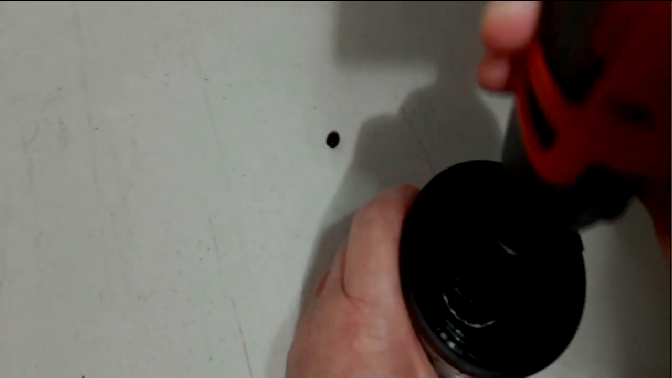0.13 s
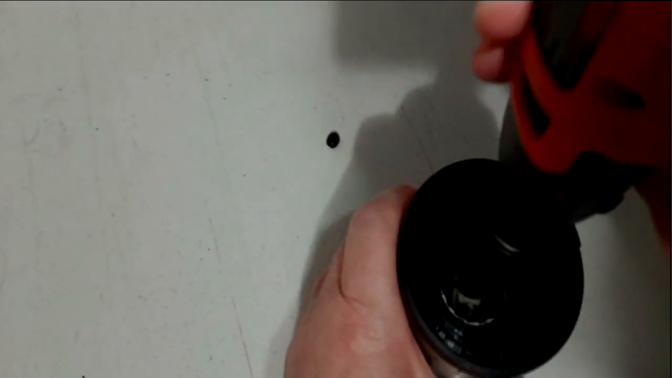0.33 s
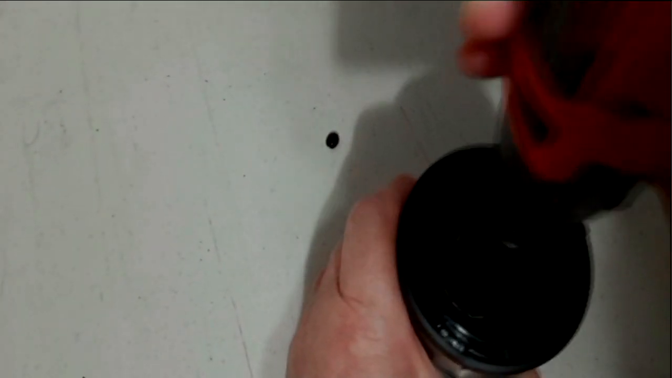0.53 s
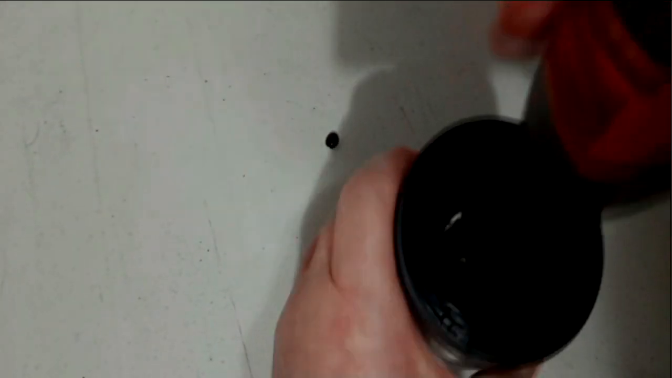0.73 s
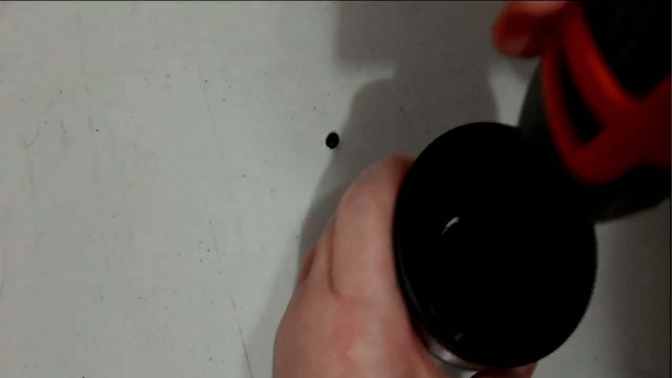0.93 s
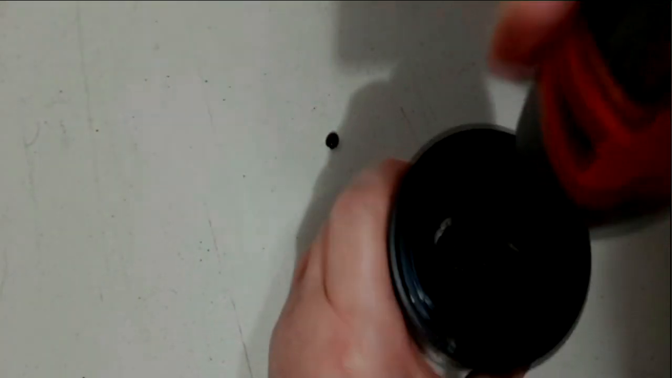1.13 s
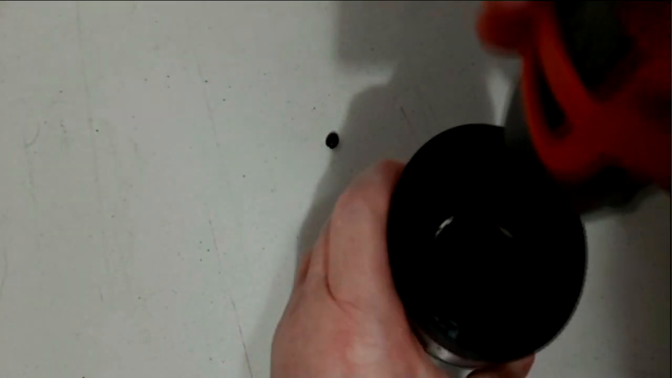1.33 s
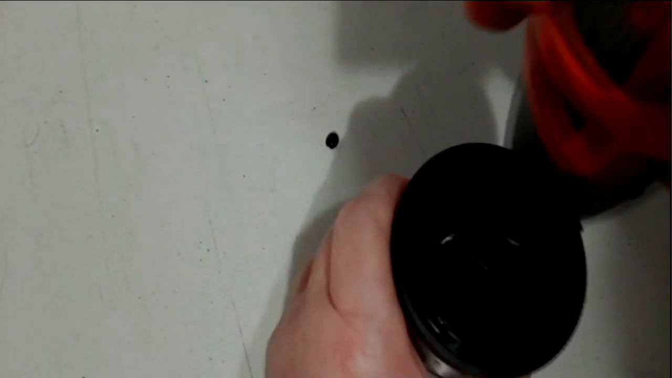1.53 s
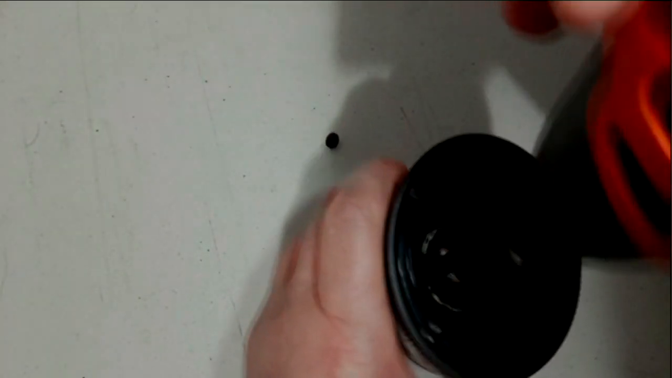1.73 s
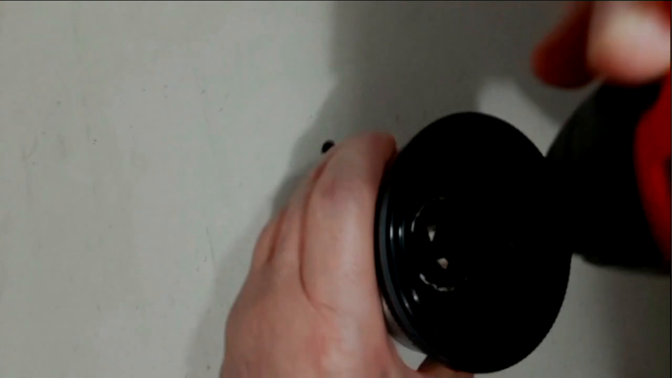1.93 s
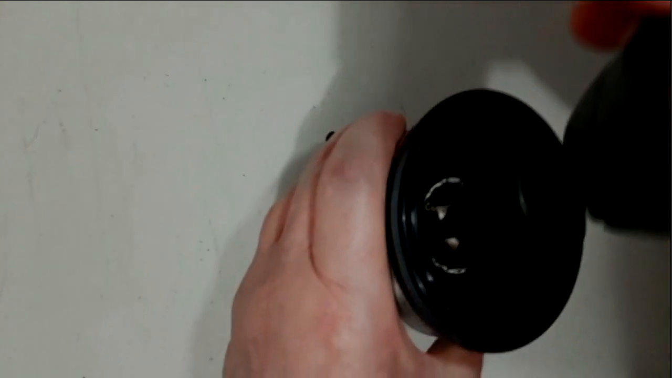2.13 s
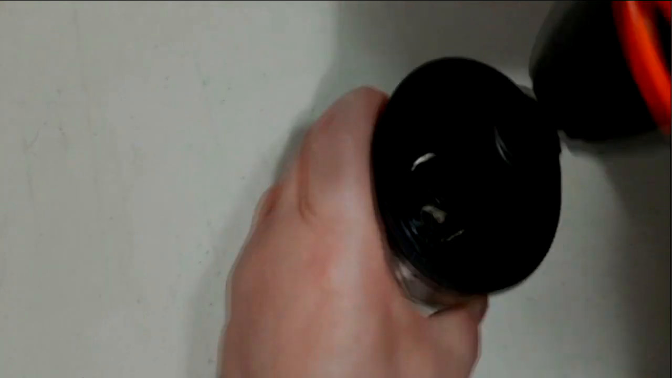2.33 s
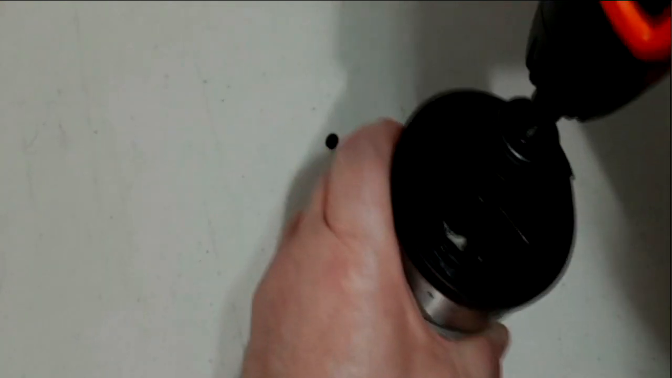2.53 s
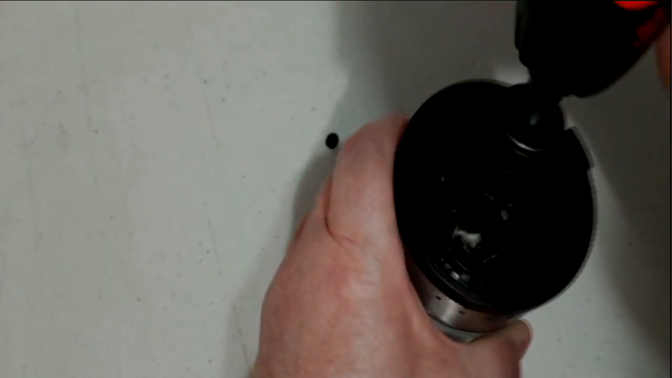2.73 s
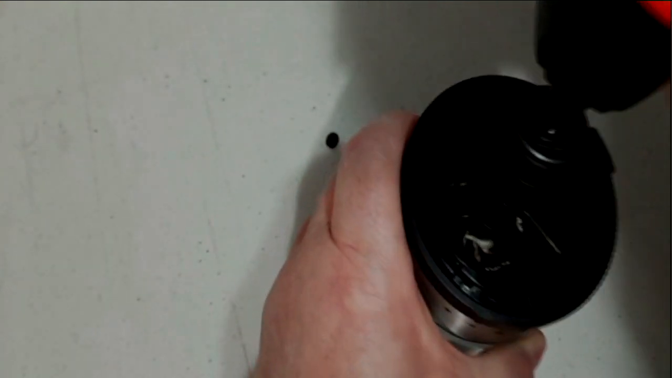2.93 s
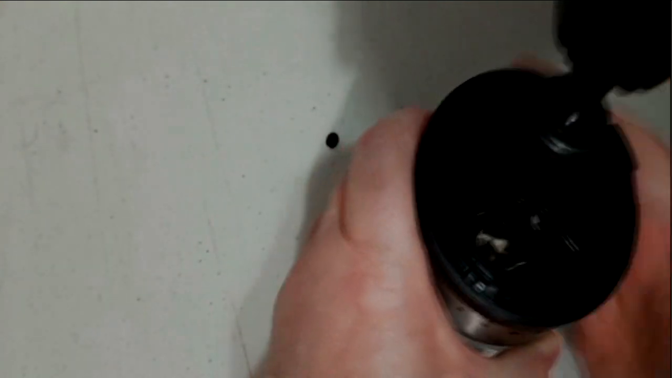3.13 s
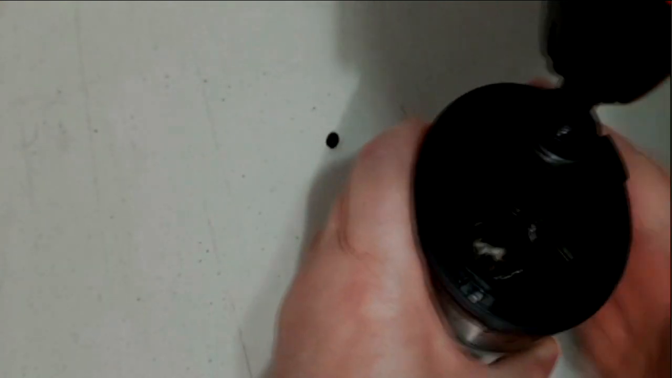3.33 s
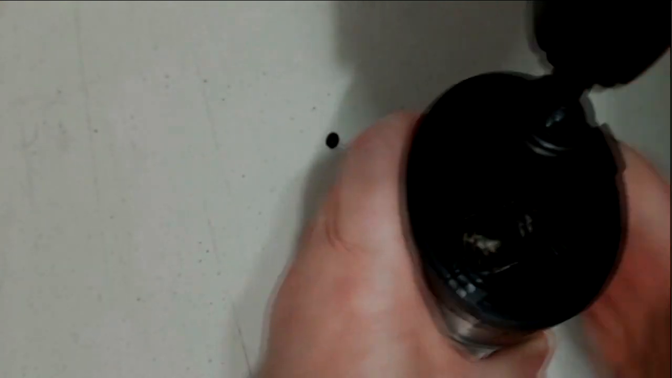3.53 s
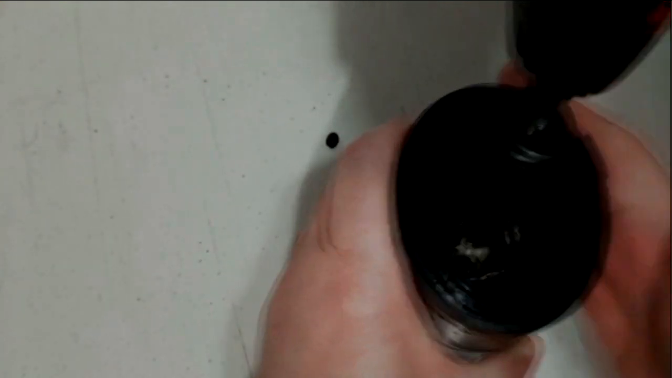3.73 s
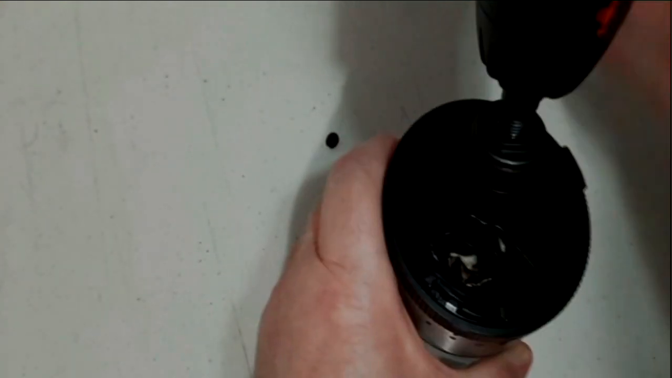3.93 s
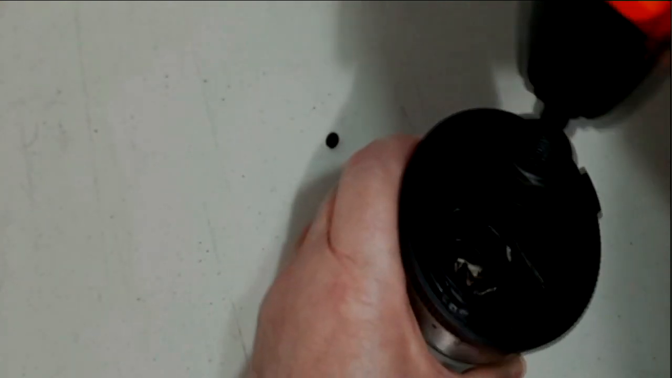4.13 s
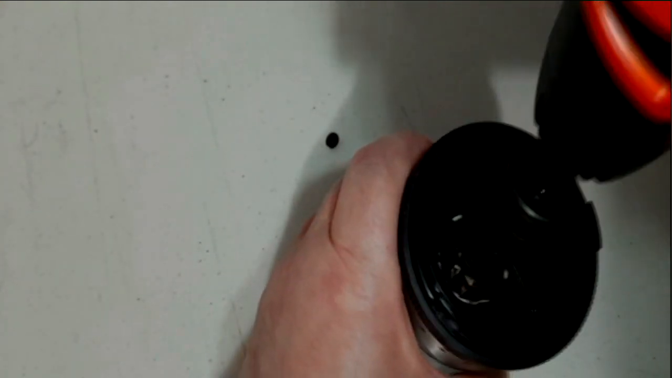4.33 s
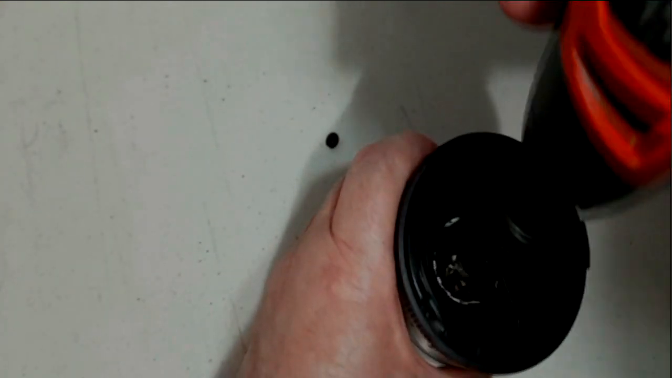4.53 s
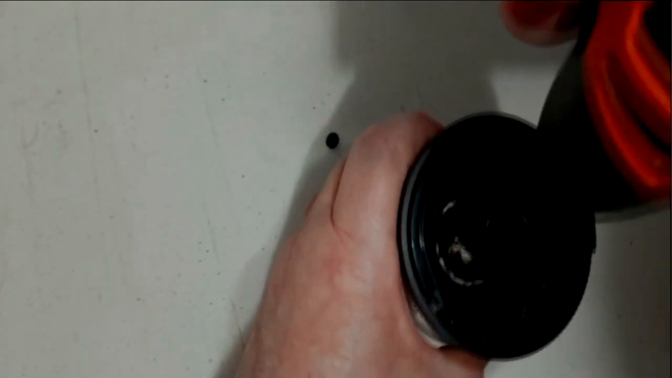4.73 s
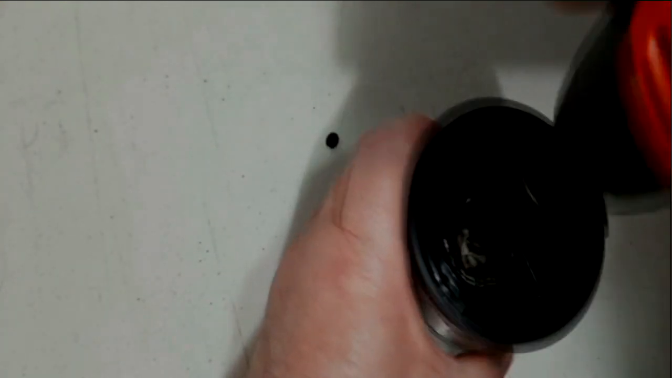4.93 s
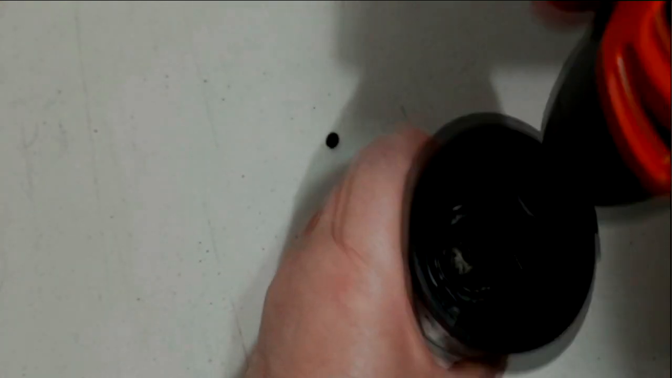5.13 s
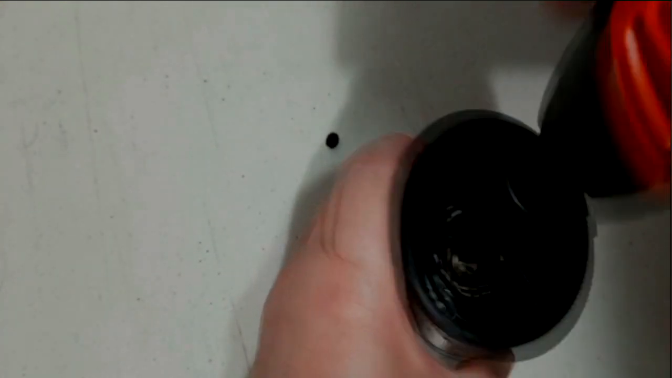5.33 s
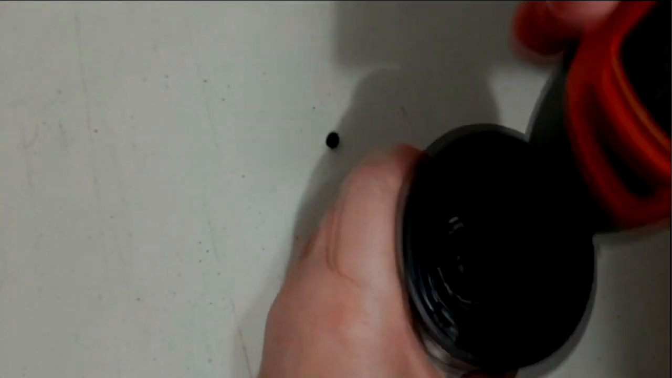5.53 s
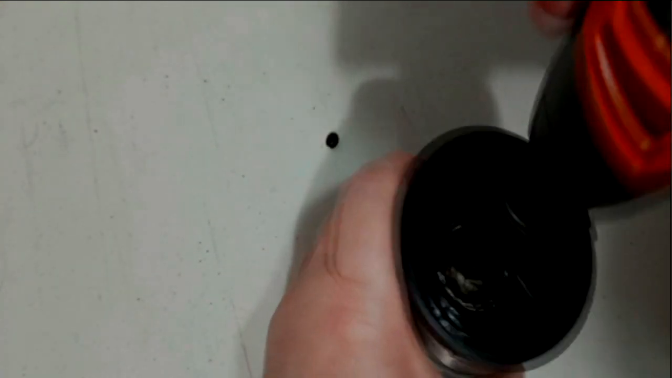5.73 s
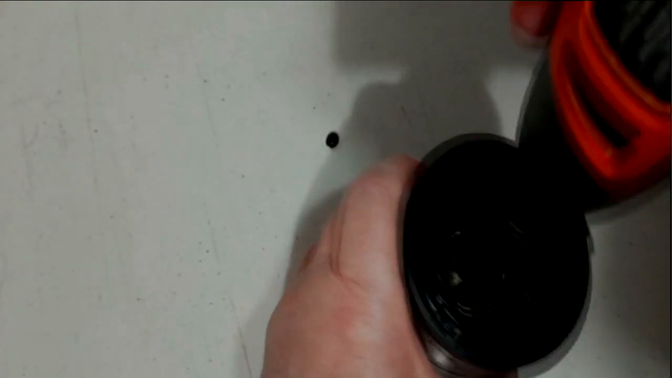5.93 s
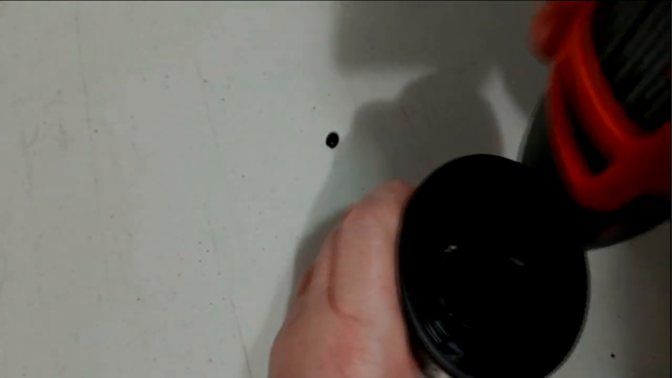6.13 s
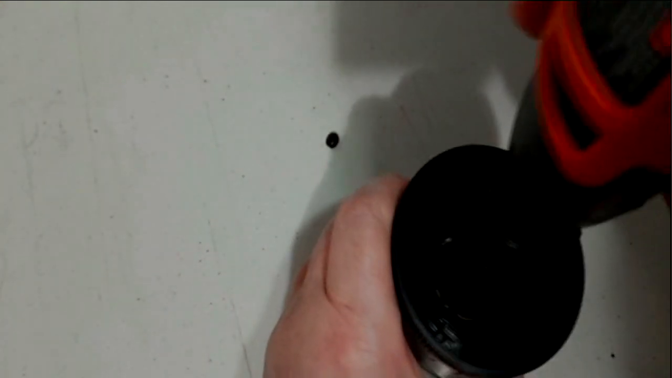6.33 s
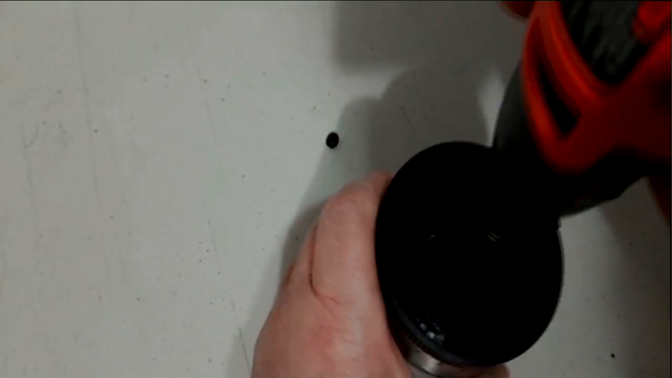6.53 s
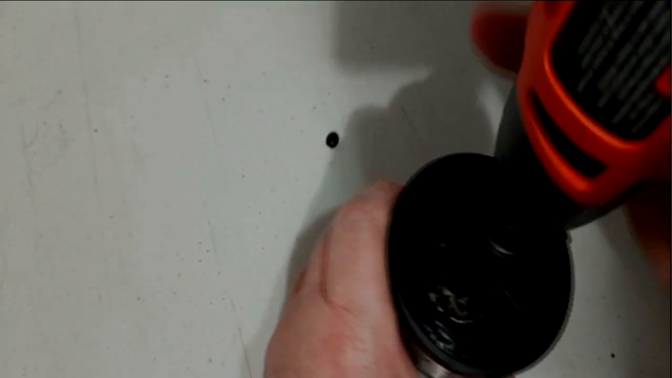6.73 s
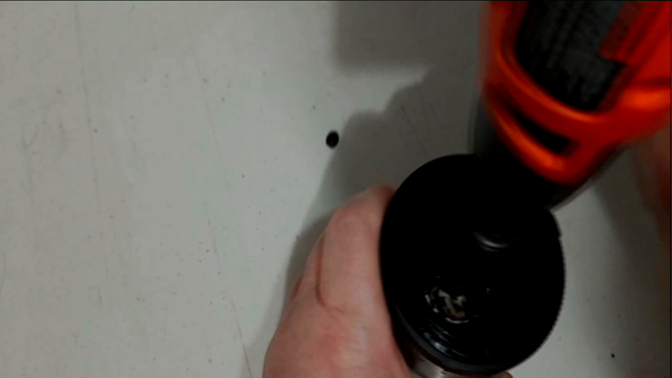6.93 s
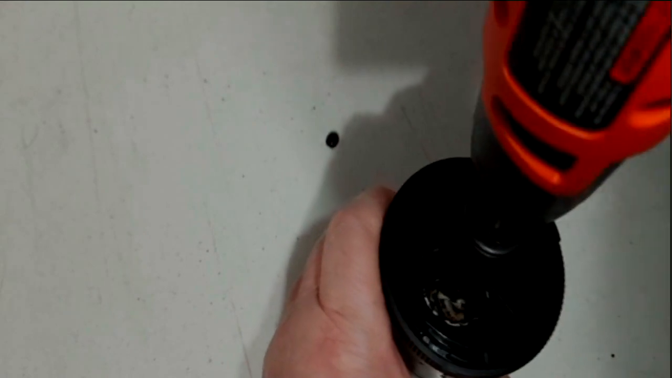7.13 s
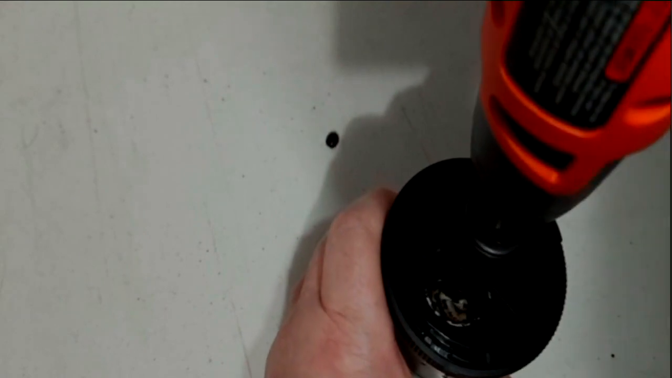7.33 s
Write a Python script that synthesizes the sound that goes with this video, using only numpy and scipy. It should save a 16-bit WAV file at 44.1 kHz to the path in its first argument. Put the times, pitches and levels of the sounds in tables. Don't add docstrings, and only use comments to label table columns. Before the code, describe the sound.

Close motor whine and crunchy bean grinding winds down, a clutch ring clicks four times, the motor grinds again, coasts down, and the mill knocks.

```python
import sys
import numpy as np
from scipy import signal
from scipy.io import wavfile
from scipy.ndimage import uniform_filter1d

SR = 44100
rng = np.random.default_rng(int(sys.argv[2]) if len(sys.argv) > 2 else 0)


def master(y):
    cut = np.clip(np.atleast_2d(y).T, -1, 1)
    pcm = np.round(cut * 32767)
    wavfile.write(sys.argv[1], SR, pcm.astype(np.int16))


def level_to_linear(level):
    exponent = np.asarray(level, float) / 20
    return 10 ** exponent


N = 325017
FRAME, HOP = 512, 128

# (start t/s, let go t/s, standstill t/s)
RUNS = [
    (-.2, 1.47, 1.76),
    (4.795, 6.445, 6.8),
]
# (f/Hz, correlation)
RUSH_SAME = [(100, .9), (400, 0.95), (1000, 0.5), (3000, 0.1), (6000, 0.83), (12000, 0.1)]
# (f/Hz, correlation)
AIR_SAME = [(30, .88), (130, .93), (290, .75), (640, .3), (1400, -.17), (4000, 0)]

ATTACK_DB = -30.5
STOP_DB, STOP_POWER = -45.5, 6.2


def evened(x):
    return x / np.sqrt(np.mean(x ** 2) + 1e-20)


def read(points, hz):
    f, value = np.transpose(points)
    return np.interp(np.log(hz + 1), np.log(f + 1), value)


def add(mix, s, sound):
    part = mix[:, round(s * SR):][:, :sound.shape[1]]
    part += sound[:, :part.shape[1]]


def panned(sound, pan_db):
    return sound * level_to_linear([[pan_db / 2], [-pan_db / 2]])


def bump(t, s, half):
    return np.exp(-((t - s) / half) ** 2)


def between(t, start, end, fade=.005):
    return np.clip((t - start) / fade, 0, 1) * np.clip((end - t) / fade, 0, 1)


def wander(hz):
    slow = signal.lfilter(*signal.butter(2, hz, fs=SR / HOP), rng.standard_normal(N // HOP + 2))
    return np.interp(np.arange(N) / HOP, np.arange(len(slow)), evened(slow))


def noise(colour, same, lead=None, patchy_db=1.5, size=FRAME, shape_db=None):
    # (f/Hz, left over right level/dB)
    balance = [(60, 0.5), (180, -2), (550, -1), (1650, -3), (4970, -2.2), (15000, -1)]
    hop = size // 4
    frames, hz = N // hop + 5, np.fft.rfftfreq(size, 1 / SR)
    a, b, c, d, patches = rng.standard_normal((frames, len(hz), 5)).T
    patches = evened(uniform_filter1d(uniform_filter1d(patches, 6, 0), 14, 1))
    same = np.clip(read(same, hz), -1, 1)[:, None]
    turn = 1 if lead is None else np.exp(-1j * read(lead, hz))[:, None]
    left = a + 1j * b
    right = same * turn * left + np.sqrt(1 - same ** 2) * (c + 1j * d)
    z = np.array([left, right]) * level_to_linear(read(colour, hz)[:, None] + patchy_db * patches)
    unit = np.sqrt(np.mean(signal.istft(z, nperseg=size, noverlap=size - hop)[1].mean(0) ** 2))
    if shape_db:
        lean_db = read(balance, hz)[:, None] * np.array([.5, -.5])[:, None, None]
        z *= level_to_linear(shape_db(hz[:, None], np.arange(frames) * hop / SR) + lean_db)
    return signal.istft(z, nperseg=size, noverlap=size - hop)[1][:, :N] / unit


def motion(t, run, speed):
    # (t/s, sag f/Hz, half length t/s)
    bites = [(.05, 55, .06), (.22, 54, .065), (.37, 62, .075), (.55, 35, .045), (.66, 50, .1),
             (.845, 85, .05), (1.08, 28, .06), (1.23, 52, .12), (4.86, 150, .17), (5.13, 32, .055),
             (5.28, 42, .05), (5.39, 68, .075), (5.57, 25, .05), (5.72, 66, .08), (5.84, 62, .07),
             (6.055, 22, .03), (6.17, 36, .06), (6.45, 30, .1)]
    full_load_hz = 45
    spin_up_s = .011
    (start, stop, still), (free_hz, gain, coast_s) = run, speed
    sag = sum(depth * bump(t, s, half) for s, depth, half in bites)
    on, off = np.clip(t - start, 0, stop - start), np.clip(t - stop, 0, still - stop)
    hz = (free_hz + gain * on - sag) * (1 - np.exp(-on / spin_up_s)) * np.exp(-off / coast_s)
    return hz, np.tanh(sag / full_load_hz), off / coast_s / np.log(2), off / (still - stop)


def surge(t, start):
    attack_s, surge_s = 0.057, .16
    return np.exp(-abs(t - start - attack_s) / surge_s), np.clip(1 - (t - start) / attack_s, 0, 1)


def gears(run, speed, surge_db, overtones):
    load_whine_db = [5, 12, 4, 7, 7, 7]
    teeth = 16
    coast_load = .95
    coast_lead = -1.2
    whine_db_per_octave, surge_whine = 6.5, .8
    housing_hz, housing_db = 1080, -16
    t = np.arange(N) / SR
    tilt = np.clip((t - run[0]) / (run[1] - run[0]), 0, 1) ** 2.6
    free = np.clip((t - run[1]) / .03, 0, 1)
    hz, load, lost, dying = motion(t, run, speed)
    gate = between(t, run[0], run[2], fade=.01)
    push, rise = surge(t, run[0])
    load = np.maximum(load * (1 - free), coast_load * free)
    turns = np.cumsum(hz * (1 + 0.0055 * wander(102))) / SR
    shared_db = (surge_whine * surge_db * push + ATTACK_DB * rise
                 - whine_db_per_octave * lost + STOP_DB * dying ** STOP_POWER)
    out = np.zeros((2, N))
    for (k, lead, last_lead, db, last_db), load_db in zip(overtones, load_whine_db):
        level_db = db + tilt * (last_db - db) + load_db * load + shared_db
        level_db = level_db + housing_db * free * np.log2((k * hz + 1) / housing_hz) ** 2
        shift = (1 - free) * (lead + tilt * (last_lead - lead)) + free * coast_lead
        for side in (0, 1):
            wave = np.cos(2 * np.pi * round(k) * turns + (1 - side) * shift)
            out[side] += level_to_linear(level_db + 4.0 * wander(21.86)) * wave
    return np.sqrt(2) * gate * out, gate * np.cos(2 * np.pi * turns / teeth)


def shadowed(x):
    # (from t/s, to t/s, centre f/Hz, width f/Hz, level/dB)
    centre_dip = (5.0, 5.9, 2620, 260, -22)
    start, end, dip_hz, width, shadow_db = centre_dip
    hz, t, z = signal.stft(x, SR, nperseg=FRAME)
    depth = np.clip(0.75 + 0.3 * np.interp(t, np.arange(N) / SR, wander(14)), 0, 1.5)
    depth = depth * between(t, start, end, fade=.08)
    keep = level_to_linear(shadow_db * depth * np.exp(-((hz[:, None] - dip_hz) / width) ** 4))
    return signal.istft(z - (1 - keep) * z.mean(0), SR, nperseg=FRAME)[1][:, :N]


def driver():
    # (free tooth rate f/Hz, gain as the beans run out Hz/s, coasting t/s)
    speeds = [(1094, 5, .14), (1047, 64, .215)]
    # (rush level/dB, starting surge level/dB, jolt at let go level/dB)
    efforts = [(-27, -2, 4.5), (-27.5, 6, -2.5)]
    # (multiple, left lead at start/rad, at end/rad, level at start/dB, at end/dB)
    overtones_a = [(1, -2.5, -2.5, -43.5, -41), (2, -1.7, 1.5, -42.5, -52), (3, -2, -2, -38, -37.5),
                   (4, -2, -1, -42.5, -42.5), (5, -1, -2.5, -49, -59), (6, -13, 0, -58, -53.5)]
    overtones_b = [(1, -2.8, -.3, -38, -39), (2, 1.3, 4, -45, -49), (3, 3.5, 4.2, -42, -38),
                   (4, 4.3, 0, -43, -46), (5, -1.5, -2, -53, -56), (6, .7, 4, -51, -54)]
    # (f/Hz, level/dB per Hz)
    rush_colour = [(110, -72), (180, -41.5), (272, -17.5), (404, -22), (905, -11.5), (1090, -5), (1680, -5),
                   (2070, -1), (2640, -6), (3180, -3), (3840, -2.5), (6500, -3), (7990, -7.5), (11600, -1),
                   (16000, -9.5)]
    # (f/Hz, phase/rad)
    rush_lead = [(0, 3), (600, 1.03), (1120, -2.5), (2240, -2), (2500, -3.5), (3100, -2), (3530, -3.5),
                 (4050, -3), (5430, -2), (7920, -1), (10600, -10.5), (10900, 6.5), (12700, -18.5),
                 (16500, 32)]
    jolt_delay_s, jolt_rise_s, jolt_fall_s = 0.03, 0.022, 0.13
    load_rush_db, coast_db_per_octave = 1, 5.5
    hiss_db, hiss_coast_db = -3.5, -22
    body_db, body_coast_db = 5, 16.5

    def shape_db(hz, t):
        level = 0
        high, low = np.clip((hz - 7000) / 1200, 0, 1), np.clip((1900 - hz) / 900, 0, 1)
        for run, speed, (db, surge_db, jolt_db) in zip(RUNS, speeds, efforts):
            start, stop, still = run
            _, load, lost, dying = motion(t, run, speed)
            push, rise = surge(t, start)
            jolt_s = stop + jolt_delay_s
            jolt = bump(t, jolt_s, np.where(t < jolt_s, jolt_rise_s, jolt_fall_s))
            rush_db = db + ATTACK_DB * rise + surge_db * push + load_rush_db * load + jolt_db * jolt
            rush_db = rush_db - coast_db_per_octave * lost + STOP_DB * dying ** STOP_POWER
            slow = rise + dying ** 2
            tone_db = high * (hiss_db + hiss_coast_db * slow) + low * (body_db + body_coast_db * slow)
            level = level + between(t, start, still) * level_to_linear(rush_db + tone_db)
        return 20 * np.log10(level + 1e-9)

    rush = level_to_linear(5.0) * shadowed(noise(rush_colour, RUSH_SAME, rush_lead, shape_db=shape_db))
    whine_a, throb_a = gears(RUNS[0], speeds[0], efforts[0][1], overtones_a)
    whine_b, throb_b = gears(RUNS[1], speeds[1], efforts[1][1], overtones_b)
    cracks = np.minimum(rng.exponential(1, N), 4) * (rng.random(N) < 120 / SR)
    cracks = signal.oaconvolve(cracks, np.exp(-np.arange(600) / SR / 0.0026))[:N]
    rush = rush * (1 + 0.05 * (throb_a + throb_b)) * (0.77 + 0.19 * cracks) * level_to_linear(0.35 * wander(28))
    return rush + whine_a + whine_b


def shudder():
    # (until t/s, level/dB)
    drone = (0.518, -33.5)
    # (t/s, level/dB, half length t/s)
    rocks = [
        (0.036, -30, 0.082),
        (0.222, -30, 0.047),
        (0.313, -38.5, 0.031),
        (0.408, -31.5, 0.055),
    ]
    # (f/Hz, level/dB per Hz)
    drone_colour = [(15, -53.5), (32, -28.5), (75, -11.5), (129, 7.5), (177, -12.5), (237, -18.5),
                    (349, -13.5), (419, -40), (450, -14), (580, -53), (990, -120)]
    t = np.arange(N) / SR
    level = level_to_linear(drone[1]) * between(t, -1, drone[0], fade=0.043)
    level = level + sum(level_to_linear(db) * bump(t, s, half) for s, db, half in rocks)
    return level * noise(drone_colour, AIR_SAME, patchy_db=-0.8, size=2048)


def room():
    # (t/s, level/dB)
    room_gain = [(0, -1), (.7, -3), (1.54, -3.5), (2.02, -6.5), (2.4, -4), (2.95, 2), (3.5, -0.5), (4.7, 1),
                 (5.54, -5.5), (6.3, 0.5), (6.95, -3.5), (7.37, -1.5)]
    # (f/Hz, level/dB per Hz)
    air_colour = [(15, -60), (36, -36), (55, -10), (80, -20), (140, -16), (190, -25), (330, -17),
                  (400, -25), (620, -22), (900, -27), (2500, -32), (3500, -39), (7300, -46), (8300, -56),
                  (13000, -53), (16000, -60)]
    hum_hz, hum_db, air_db, rumble_db = 103.9, -47, -51.5, 5
    air_share, dark_db = 0.91, 1.15

    def shape_db(hz, t):
        gain_db = np.interp(t, *np.transpose(room_gain))
        running = sum(between(t, run[0], run[2], fade=.1) for run in RUNS)
        treble = np.clip((hz - 2000) / 5000, 0, 1)
        return gain_db * (air_share + dark_db * treble) + rumble_db * running * (hz < 120)

    turns = np.cumsum(hum_hz * (1 + 0.007 * wander(1.5))) / SR
    gain_db = np.interp(np.arange(N) / SR, *np.transpose(room_gain))
    hum = np.sqrt(2) * level_to_linear(hum_db + gain_db + 0.4 * wander(6.3)) * np.cos(2 * np.pi * turns)
    air = noise(air_colour, AIR_SAME, patchy_db=1.0, size=2048, shape_db=shape_db)
    return panned(hum, -1) + level_to_linear(air_db) * air


def ticks():
    # (t/s, peak level/dB, lower pitch f/Hz, pan/dB, snap level/dB)
    tick_events = [(0.975, -26, 1500, 0.5, -30), (5.81, -24.5, 1300, -1, -25), (1.862, -44, 2800, -1, -3),
                   (1.909, -46.5, 3100, -6, 0), (2.293, -63, 3800, -3, -5), (2.34, -48, 3500, -2, -12),
                   (2.397, -43.5, 2390, 1, -10), (4.246, -33.5, 3300, 0.5, 28),
                   (4.565, -45.5, 1000, -3, -18.5), (6.824, -48, 3900, 0.5, 4), (6.98, -44.5, 1140, 3, -35),
                   (7.286, -50.5, 1380, 1, -25)]
    pitch_ratio, burst_t60 = 1.9, .03
    out, t = np.zeros((2, N)), np.arange(3000) / SR
    for s, db, hz, pan_db, snap_db in tick_events:
        burst = rng.standard_normal((2, len(t))) * level_to_linear(-60 * t / burst_t60)
        modes = np.sin(2 * np.pi * hz * t) + np.sin(2 * np.pi * hz * pitch_ratio * t)
        ringing = np.exp(-t / 0.00041) * modes
        tick = signal.fftconvolve(burst, ringing[None] / np.linalg.norm(ringing), axes=1)[:, :len(t)]
        tick = tick + level_to_linear(snap_db) * uniform_filter1d(burst, size=3)
        add(out, s, panned(level_to_linear(db + 11) * tick / abs(tick).max(), pan_db))
    return out


def knocks():
    # (t/s, peak level/dB, pitch f/Hz, t60/s, upper modes level/dB)
    knock_events = [
        (1.864, -40, 203, 0.12, -8),
        (1.907, -39.5, 270, 0.068, -2),
        (2.335, -48, 274, 0.09, -6),
        (3.182, -68, 112, 0.19, -52),
        (3.38, -40, 283, 0.082, -8),
        (3.57, -37, 107, 0.077, -23),
        (3.793, -48.5, 113, 0.27, 0),
        (6.726, -21.5, 119, 0.11, -7),
        (6.978, -24.5, 115, 0.14, -7.5),
        (7.283, -46, 306, 0.042, 6),
    ]
    # (pitch ratio, level/dB)
    upper_modes = [(.5, -10.5), (2.102, -4.5), (2.9, 0), (4.6, 2.5)]
    out, t = np.zeros((2, N)), np.arange(12000) / SR
    for s, db, hz, t60, upper_db in knock_events:
        body = level_to_linear(-60 * t / t60) * np.sin(2 * np.pi * hz * t)
        for ratio, g in upper_modes:
            fall = level_to_linear(upper_db + g - 60 * t / t60 * ratio ** 1.13)
            body -= fall * np.sin(2 * np.pi * hz * ratio * t)
        add(out, s, panned(level_to_linear(db + 15) * body * (1 - np.exp(-t / 0.014)), -2.4))
    return out


def causal(colour, tilt_db):
    hz = abs(np.fft.fftfreq(2048, 1 / SR))
    level_db = read(colour, hz) + tilt_db * np.log2((hz + 50) / 3000)
    log_gain = np.log(level_to_linear(np.maximum(level_db, -80)))
    return np.fft.ifft(np.exp(np.conj(signal.hilbert(log_gain)))).real[:1024]


def clutch():
    # (t/s, peak level/dB, crack t60/s, pan/dB, tail level/dB)
    notches = [
        (3.181, -16.5, 0.01, -2, -10),
        (3.377, -12.5, 0.026, 0, -21),
        (3.573, -16.5, 0.04, 0.5, -11),
        (3.792, -14.5, 0.036, -1.5, -12),
    ]
    # (f/Hz, level/dB per Hz)
    ring_colour = [(88, -16), (150, -4.5), (361, 0), (1140, -3.5), (1760, -1), (2920, 0.5), (3620, 2),
                   (4000, 4), (4670, 0.5), (7180, 0.5), (8900, -9), (13400, -0.5), (16000, -12.5)]
    # (from t/s, to t/s, level/dB, fade t/s)
    rub_span = (3.18, 3.43, -52, .02)
    # (f/Hz, level/dB per Hz)
    rub_colour = [(1180, -34), (2000, -10), (4770, -4), (5780, -3), (6880, 0), (8120, -18), (11700, -1),
                  (16000, -7)]
    slip_s = .008
    out, t = np.zeros((2, N)), np.arange(5000) / SR - slip_s
    ringing = causal(ring_colour, tilt_db=-2.5)
    for s, db, t60, pan_db, tail_db in notches:
        slip = 0.11 * np.exp(t / 0.0081)
        crack = level_to_linear(-60 * t / t60) + level_to_linear(tail_db - 60 * t / 0.17)
        fall = np.where(t < 0, slip, crack)
        shared, apart = rng.standard_normal(len(t)), rng.standard_normal((2, len(t)))
        burst = (0.66 * shared + 0.75 * apart) * fall
        snap = signal.fftconvolve(burst, ringing[None], axes=1)[:, :len(t)]
        add(out, s - slip_s, panned(level_to_linear(db + 1.5) * snap / abs(snap).max(), pan_db))
    start, end, rub_db, fade = rub_span
    rub = level_to_linear(rub_db) * noise(rub_colour, RUSH_SAME, patchy_db=0)
    return out, between(np.arange(N) / SR, start, end, fade) * rub


def kitchen(x):
    # (f/Hz, t60/s)
    decay = [(200, 0.1), (1000, 0.48), (4000, 0.23), (12000, 0.15)]
    taps = np.zeros((2, SR // 2))
    at = np.arange(200, SR // 2 - 20, 20)
    at = at + rng.integers(0, 20, (2, len(at)))
    np.put_along_axis(taps, at, rng.choice([-1., 1.], at.shape), 1)
    hz, t, z = signal.stft(taps, SR, nperseg=256)
    tail = signal.istft(z * level_to_linear(-60 * t / read(decay, hz)[:, None]), SR, nperseg=256)[1]
    return signal.fftconvolve(x, tail / np.linalg.norm(tail[0]), axes=1)[:, :N]


def scene():
    snaps, rub = clutch()
    hits = snaps + ticks()
    return driver() + shudder() + room() + rub + knocks() + hits + level_to_linear(-12.5) * kitchen(hits)


def gated(x):
    gate_db, gate_depth_db, gate_top_hz = -10.5, -15, 750
    mid_side = np.array([x[0] + x[1], x[0] - x[1]]) / 2
    hz, t, z = signal.stft(mid_side, SR, nperseg=2048, noverlap=1536)
    power = abs(z) ** 2 + 1e-16
    near = uniform_filter1d(uniform_filter1d(power, size=3, axis=1), size=7, axis=2)
    under_db = 10 * np.log10(abs(near) / power[:, hz > 1000].mean((0, 1))) - gate_db
    shut = np.clip(-under_db / 3, 0, 1) * (hz[:, None] < gate_top_hz)
    z = z * level_to_linear(gate_depth_db * shut)
    mid, side = signal.istft(z, SR, nperseg=2048, noverlap=1536)[1][:, :N]
    return np.array([mid + side, mid - side])


def top_cut(x):
    return signal.sosfilt(signal.butter(12, 16860, fs=SR, output="sos"), x)


def record(dry):
    halo_floor_db = -61.5
    treble = signal.lfilter(*signal.butter(2, 3000, "high", fs=SR), dry)
    power = uniform_filter1d(uniform_filter1d((treble ** 2).mean(0), 4200), 700)
    halo = signal.lfilter(*signal.butter(1, 2500, "high", fs=SR), rng.standard_normal((2, N)))
    opened = np.maximum(power - level_to_linear(halo_floor_db) ** 2, 0) ** 0.42
    heard = gated(dry) + level_to_linear(-14.5) * opened * halo
    edge = signal.firwin(301, 16100, window=("kaiser", 5), fs=SR)
    return top_cut(signal.oaconvolve(heard, edge[None], "same"))


dry = scene()
out = record(dry)
master(out)
```